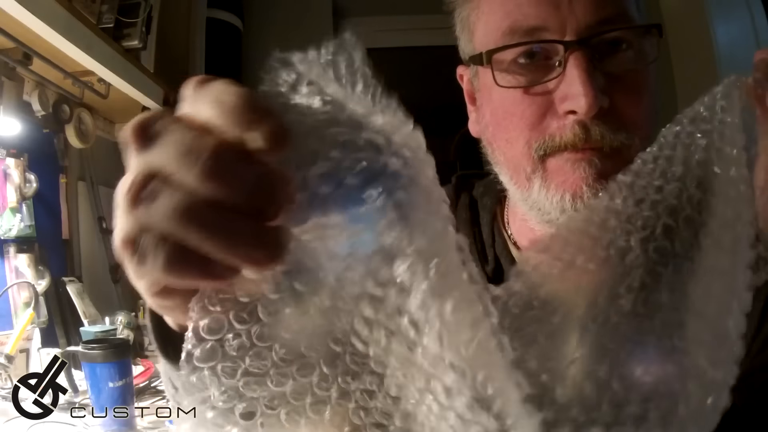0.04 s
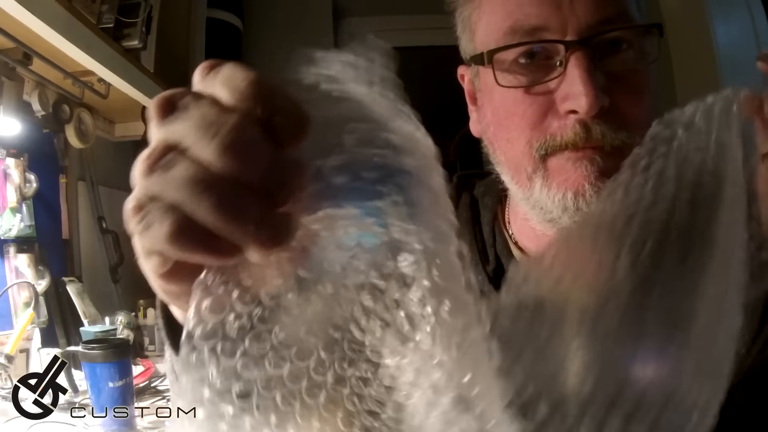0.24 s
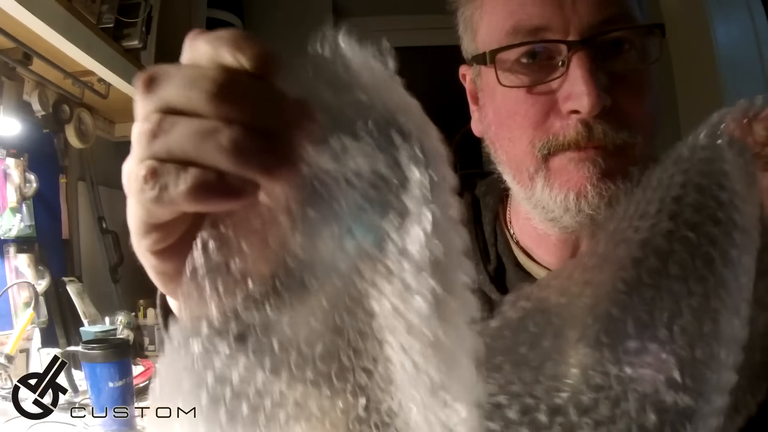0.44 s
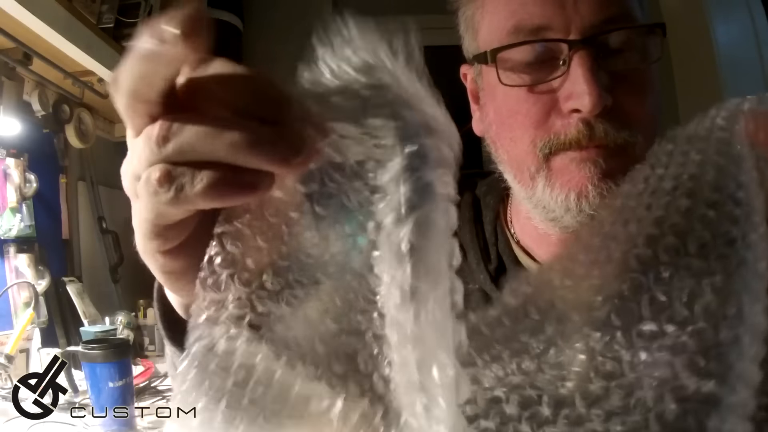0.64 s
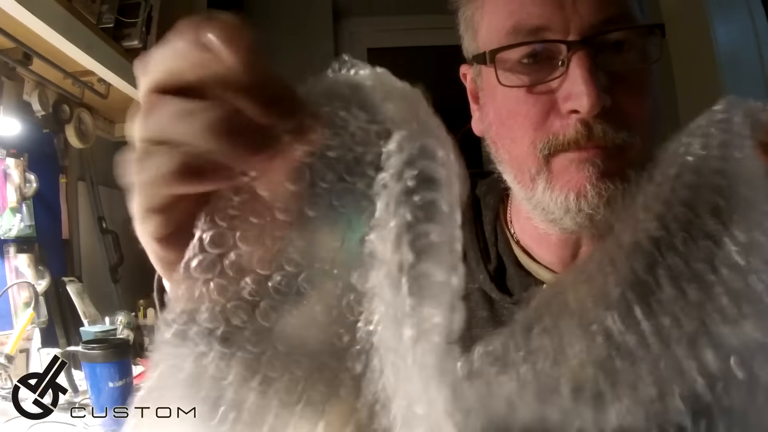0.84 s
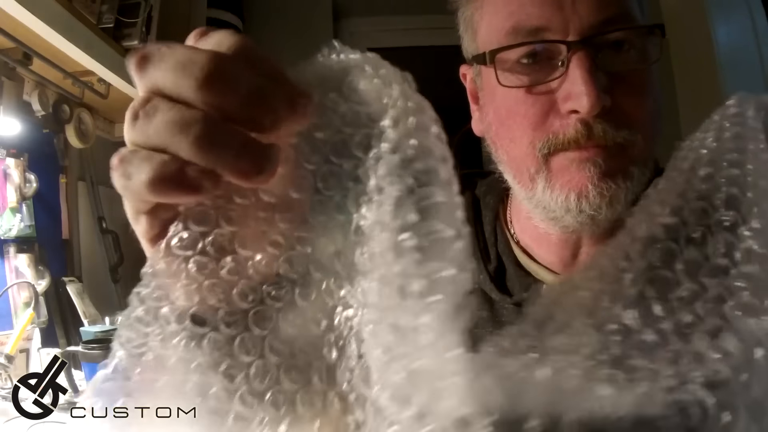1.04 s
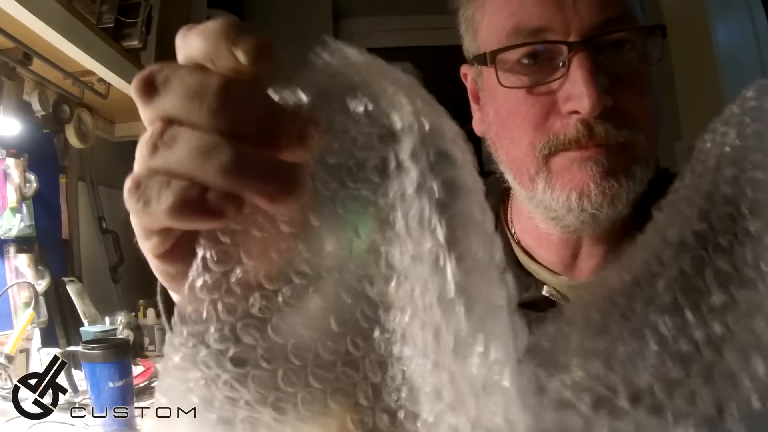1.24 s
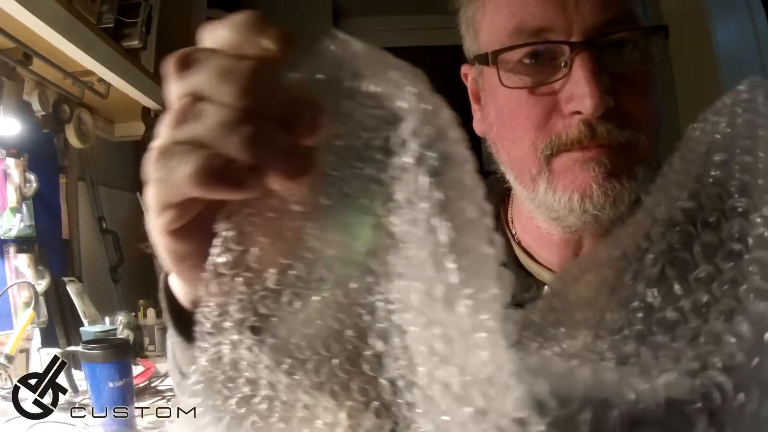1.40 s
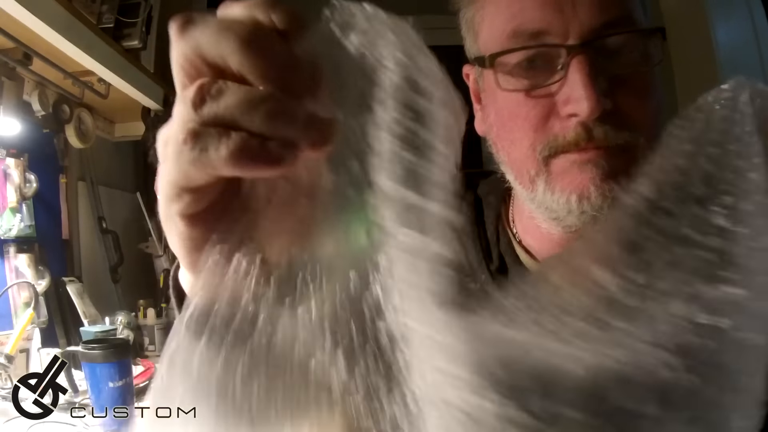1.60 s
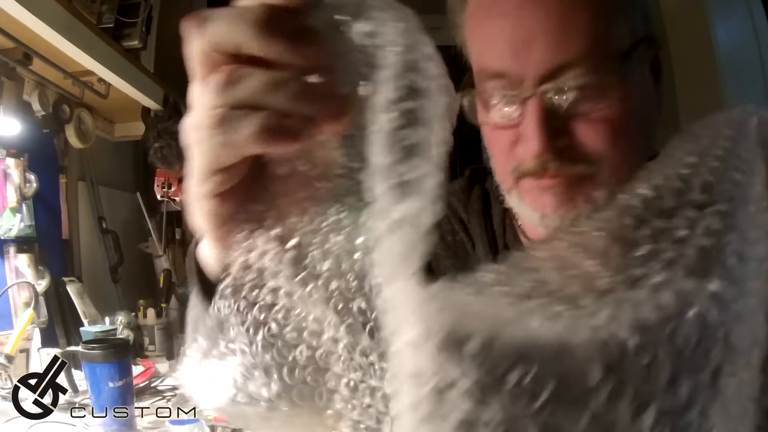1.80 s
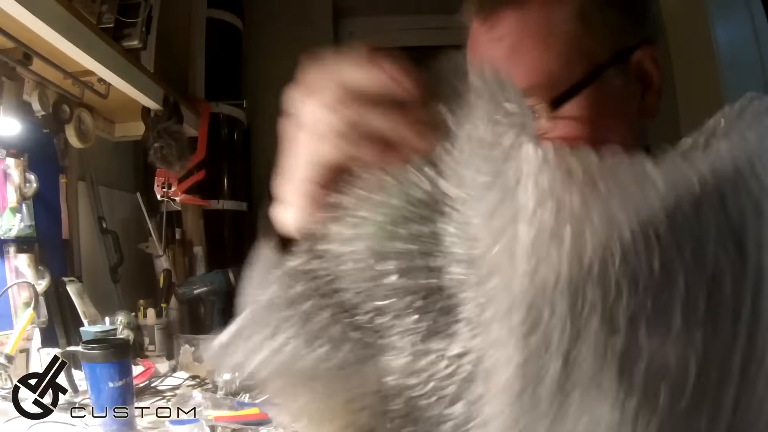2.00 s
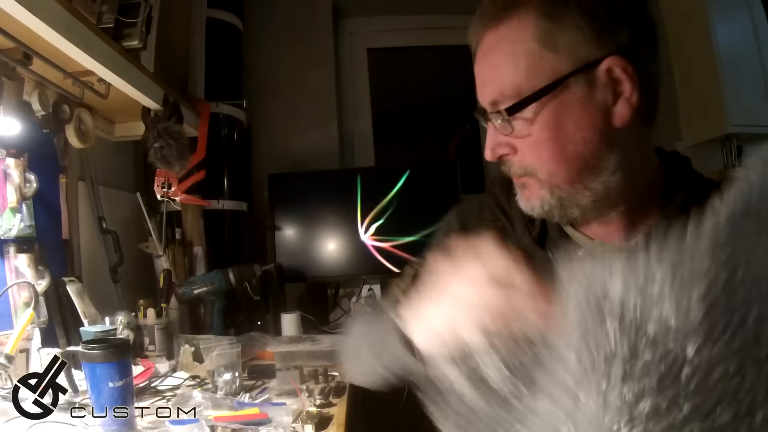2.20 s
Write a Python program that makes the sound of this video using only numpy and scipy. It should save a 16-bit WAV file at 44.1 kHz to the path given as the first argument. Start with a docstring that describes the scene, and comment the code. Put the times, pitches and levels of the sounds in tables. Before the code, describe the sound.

Bubble wrap is wrung by hand close to the microphone in a small workshop. One loud, sharp pop comes at 0.2 seconds, followed by faint crinkling, rubbing and small snaps. Three quick pops fall between 1.2 and 1.45 seconds, the first softer. A tiny squeak comes near 1.7, and a last pop at 2.0. Around 2.3 seconds the sheet rustles aside with a light knock, over faint room tone.

```python
"""Bubble wrap, wrung by hand close to the microphones in a small workshop.
Five bubbles burst, each a crack of tearing film and a puff of air; the hard ones overload the microphones.
Between bursts the film crinkles, rubs, snaps and squeaks once; at the end the sheet is swung aside
with a light knock. Hands, bench and walls throw each sound back, over faint room tone."""
import sys
import numpy as np
from scipy import signal
from scipy.fft import rfft, irfft
from scipy.io import wavfile
from scipy.ndimage import uniform_filter1d

SR = 44100
rng = np.random.default_rng(int(sys.argv[2]) if len(sys.argv) > 2 else 0)


def transcribe(u):
    """Save the signal u as a 16-bit wav file named by the first command-line argument.

    u: samples, shape (n,) or (channels, n), limited to [-1, 1]; the rate is SR.
    q: integer samples, one column per channel.
    """
    v = np.clip(np.atleast_2d(u).T, -1, 1)
    q = np.round(v * 32767).astype(np.int16)
    wavfile.write(sys.argv[1], SR, q)


N = 103635

# spectrum of creasing film: f/Hz, level/dB
CREASE_SPECTRUM = [(100, -24), (700, -10.5), (2000, -6), (4000, -5), (8300, -2), (11000, -5), (15500, -6.5)]


def amp(db):
    """Decibels to gain."""
    return 10 ** (np.asarray(db) / 20)


def unit(x):
    """Scale to rms 1."""
    return x / np.sqrt(np.mean(x ** 2) + 1e-20)


def lookup(points, hz):
    """Interpolate a table over log frequency."""
    f, value = np.transpose(points)
    return np.interp(np.log(hz + 1), np.log(f + 1), value)


def add(mix, start_s, sound):
    """Mix in a stereo sound."""
    part = mix[:, round(start_s * SR):][:, :sound.shape[-1]]
    part += sound[..., :part.shape[1]]


def convolve(a, b):
    """Convolve per channel, cut to N samples."""
    return signal.fftconvolve(np.atleast_2d(a), np.atleast_2d(b), axes=1)[:, :N]


def click(spectrum, body_db=0, top_db=0, ring_hz=1, ring_db=0, ring_octaves=0.18, size=4096):
    """Minimum-phase click, energy 1: spectrum, low and high shelf, one resonance."""
    hz = abs(np.fft.fftfreq(size, 1 / SR))
    db = lookup(spectrum, hz) + body_db / (1 + (hz / 1500) ** 2) + top_db / (1 + (10000 / (hz + 1)) ** 4)
    db += ring_db / (1 + (np.log2((hz + 1) / ring_hz) / ring_octaves) ** 2)
    log_response = np.conj(signal.hilbert(np.log(amp(db))))
    impulse = np.fft.ifft(np.exp(log_response)).real[:size // 2]
    return impulse / np.linalg.norm(impulse)


def echoes(t60, colour, rise_s, spread_db, delay_s=0.00059, size=256):
    """Uneven stereo reflections, mean energy 1 per channel; each band decays at its own rate."""
    # left-right likeness: f/Hz, correlation
    likeness = [(500, 0.24), (2000, 0.53), (5000, 0.54), (8000, 0.13), (15000, -.1)]
    t = np.arange(SR // 2) / SR
    taps = rng.standard_normal((2, len(t)))
    taps *= amp(spread_db * np.repeat(rng.standard_normal(len(t)), 10)[:len(t)])
    hz, frame_s, bands = signal.stft(taps, SR, nperseg=size)
    correlation = np.clip(lookup(likeness, hz), -1, 1)[:, None]
    mid, side = bands[0] * np.sqrt(1 + correlation), bands[1] * np.sqrt(1 - correlation)
    decay = amp(lookup(colour, hz)[:, None] - 60 * frame_s / lookup(t60, hz)[:, None])
    tail = signal.istft(np.array([mid + side, mid - side]) * decay, SR, nperseg=size)[1][:, :len(t)]
    onset = np.clip((t - delay_s) / rise_s, 0, 1)
    return unit(tail * onset) / np.sqrt(len(t))


def workshop(room_db):
    """Path from sheet to microphones: direct sound, echoes off hands and bench, then walls."""
    # small near surfaces return little bass: f/Hz, level/dB
    near_colour = [(300, -7.5), (1800, -1.5)]
    # wall reverberation: f/Hz, T60/s
    wall_t60 = [(200, 0.01), (530, 0.24), (1400, 0.2441), (3700, 0.2645), (8000, 0.2379), (11000, 0.2849),
                (15000, 0.16)]
    # its spectrum: f/Hz, level/dB
    wall_colour = [(100, -14), (500, -14), (1000, -8.5), (2000, -2), (8000, 0)]
    path = amp(-1) * echoes(t60=[(1, 0.04)], colour=near_colour, rise_s=0.00034, spread_db=2.5)
    path += amp(room_db) * echoes(wall_t60, wall_colour, rise_s=0.0039, spread_db=2.0)
    path[:, 0] += 1
    return path


def room_tone():
    """Low rumble and faint hiss, partly common to both channels."""
    # still room air: f/Hz, level/dB
    air_spectrum = [(35, -4.5), (70, -7), (150, -16.5), (1000, -21.5), (4000, -25), (15000, -37.5)]
    noise = rng.standard_normal((2, N)) + rng.standard_normal(N)
    response = amp(lookup(air_spectrum, np.fft.rfftfreq(N, 1 / SR)))
    return amp(-54) * unit(irfft(rfft(noise) * response, N))


def grip(spread_db=2.4, step_s=0.018):
    """Gain that wanders as the grip catches and lets go."""
    t = np.arange(N) / SR
    knots_s = np.arange(0, t[-1] + step_s, step_s)
    return amp(spread_db * np.interp(t, knots_s, rng.standard_normal(N)[:len(knots_s)]))


def rustle(folds=9, creases_per_s=3200, spread_db=3.8, room_db=-7.5):
    """Tiny creases click in clumps, each fold with its own pitch and pan; the sheet rubs on the hands."""
    # handling of the sheet: t/s, crinkle level/dB, rub level/dB
    handling = [(0, -45, -65.5), (.08, -47.5, -77), (.30, -44, -61), (.348, -30, -48), (.38, -40, -57),
                (.46, -46.5, -85), (.53, -41.5, -57), (.58, -44, -65), (.69, -41, -63), (.74, -45, -70),
                (.78, -39.5, -56), (.82, -44, -65), (.91, -40, -51), (.98, -46.5, -65), (1.03, -41.5, -53),
                (1.08, -45, -69), (1.22, -39, -55.5), (1.42, -45, -69), (1.61, -46, -76),
                (1.648, -36, -45.5), (1.69, -42, -56), (1.74, -38.5, -52.5), (1.79, -46, -74),
                (1.85, -38, -47.5), (1.89, -42.5, -62.5), (1.99, -39, -49.5), (2.20, -43, -64),
                (2.28, -31.5, -47), (2.31, -38, -53), (2.35, -31.5, -46)]
    # film rubbing on skin: f/Hz, level/dB
    rub_spectrum = [(30, 10), (140, -7.5), (470, 2), (780, -7), (1200, -1), (1550, -9), (2100, -6),
                    (3000, -24), (8000, -49)]
    t = np.arange(N) / SR
    knots_s, crinkle_db, rub_db = np.transpose(handling)
    effort = amp(np.interp(t, knots_s, crinkle_db))
    creases = np.zeros((2, N))
    for fold, fold_hz in enumerate(np.geomspace(2174, 13170, folds)):
        sizes = amp(spread_db * np.minimum(rng.exponential(1, N), 5)) * rng.choice([-1, 1], N)
        clicks = sizes * grip() * (rng.random(N) < creases_per_s / folds / SR) * effort
        path = convolve(click([(1, 0)], ring_hz=fold_hz, ring_db=11), workshop(room_db))
        pan = 1 + 0.23 * (-1) ** fold * np.array([[1], [-1]])
        creases += convolve(clicks, path) * pan
    crinkle = unit(convolve(creases, click(CREASE_SPECTRUM))) * np.sqrt(np.mean(effort ** 2))
    friction = convolve(rng.standard_normal(N) * grip(), click(rub_spectrum))
    rub = unit(convolve(friction, workshop(room_db)))
    return crinkle + rub * amp(np.interp(t, knots_s, rub_db))


def snap(level_db, body_db, ring_hz):
    """One crease snaps over and rings."""
    crease = click(CREASE_SPECTRUM, body_db, ring_hz=ring_hz, ring_db=8)
    return amp(level_db) * convolve(crease, workshop(room_db=-7))


def burst(level_db, body_db, top_db, room_db, puff_db, puff_hz, ring_hz, ring_db):
    """Film tears with a crack that rings in the hollow of the hand; freed air hits one microphone, then the
    other."""
    # crack of a bubble: f/Hz, level/dB
    crack_spectrum = [(250, -8), (700, -11.5), (1300, -8), (2200, -6.5), (5000, -4.5), (6500, -1),
                      (8400, 1), (11000, -4.5), (13000, -7), (15500, -12.5)]
    flutter_decay_s, flutter_db = 0.00036, -4.5
    puff_rise_s, puff_decay_s, puff_lag_s = 0.00053, 0.0051, 0.0011
    t = np.arange(SR // 10) / SR
    flutter = rng.standard_normal((2, len(t))) * np.exp(-t / flutter_decay_s)  # of the torn film
    flutter *= amp(flutter_db) / np.linalg.norm(flutter, axis=1, keepdims=True)
    path = workshop(room_db)
    path[:, :len(t)] += flutter
    sound = amp(level_db) * convolve(click(crack_spectrum, body_db, top_db, ring_hz, ring_db), path)
    age_s = np.maximum([t, t - puff_lag_s], 0)
    puff_envelope = 2 * (1 - np.exp(-age_s / puff_rise_s)) * np.exp(-age_s / puff_decay_s)
    sound[:, :len(t)] += amp(puff_db) * puff_envelope * np.cos(2 * np.pi * puff_hz * age_s)
    return sound


def squeak(pitch_hz=2103, jitter=0.035, length_s=0.017, gain_db=-41.5):
    """Film slips on a finger: a short, unsteady chirp."""
    t = np.arange(SR // 10) / SR
    wobble = unit(uniform_filter1d(rng.standard_normal(len(t)), 20))
    hz = pitch_hz * (1 + jitter * wobble)
    swell = np.sin(np.pi * np.minimum(t / length_s, 1)) ** 2
    chirp = swell * np.sin(2 * np.pi * np.cumsum(hz) / SR)
    return amp(gain_db) * convolve(chirp, workshop(room_db=-7))


def knock(decay_s=0.008, level_db=-4.5):
    """A small hard object rattles briefly as the sheet is swung aside."""
    # resonances of the object: f/Hz, level/dB
    body_spectrum = [(300, -24), (1250, -13), (1550, 5), (2100, -14), (3150, 3), (4200, -7), (8000, -20)]
    t = np.arange(SR // 10) / SR
    rattle = rng.standard_normal(len(t)) * np.exp(-t / decay_s)
    body = convolve(rattle / np.linalg.norm(rattle), click(body_spectrum))
    return amp(level_db) * convolve(body, workshop(room_db=-10))


def scene():
    """Bursts, snaps, a squeak and a knock over rustle and room tone."""
    # bursting bubbles: t/s, crack level/dB, shelf below 1.5 kHz/dB, shelf above 10 kHz/dB, room/dB,
    # puff gain/dB, puff f/Hz, ring f/Hz, ring boost/dB
    bursts = [(0.2006, 25.5, 0.5, -2, -4.5, -27, 113, 2500, 1.5),
              (1.2396, 13, 3, -2, -14, -33, 110, 6200, 5), (1.2968, 25, 0, 0.5, -6, -25.5, 50.4, 1200, 4),
              (1.4332, 24.5, 0, 3.5, -5, -21.5, 180, 720, 7), (2.032, 20.5, 0.5, 3, -1, -25, 132, 288, 8.5)]
    # snapping creases: t/s, level/dB, shelf below 1.5 kHz/dB, ring f/Hz
    snaps = [(.0772, -15, -7, 8100), (0.0867, -16.5, -12, 7600), (.1205, -15.5, -11, 4300),
             (0.171, -14.5, 1, 7500), (.548, -24, 25, 476), (.6825, -17, -8, 5200), (.7875, -9, 15.5, 1970),
             (.8535, -20, 7, 5450), (0.891, -15, -4, 6300), (0.9096, -17, 9, 12100),
             (0.9476, -17, 15, 1150), (1.135, -15, -5, 8440), (1.153, -18, -3, 10000),
             (1.173, -19.5, -8, 4200), (1.236, -2.5, -6, 7000), (1.629, -13, 10, 7600),
             (1.817, -6, 22, 6600), (1.914, -15, -2, 7000), (1.982, -9, 11.5, 1850),
             (2.2786, -4, -12, 9000), (2.3464, -7, 12, 5900)]
    mix = room_tone() + rustle()
    for start_s, *bubble in bursts:
        add(mix, start_s, burst(*bubble))
    for start_s, *crease in snaps:
        add(mix, start_s, snap(*crease))
    add(mix, 1.727, squeak())
    add(mix, 2.2597, knock())
    return mix


def record(dry):
    """Soft microphone overload on the bursts, then a low-pass."""
    ceiling, cutoff_hz = 0.94, 15450
    clipped = ceiling * np.tanh(dry / ceiling)
    lowpass = signal.firwin(255, cutoff_hz, window=("kaiser", 7), fs=SR)
    return signal.oaconvolve(clipped, lowpass[None], "same")


dry = scene()
out = record(dry)
transcribe(out)
```